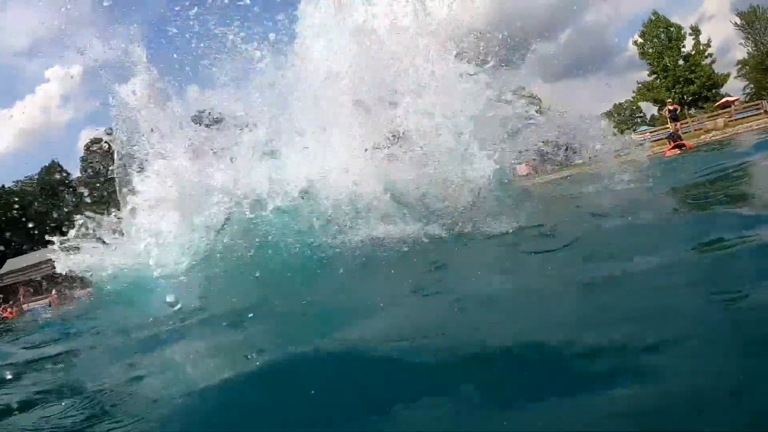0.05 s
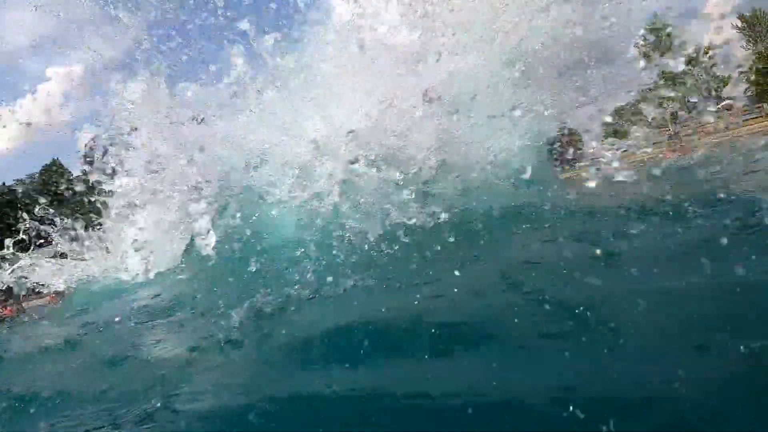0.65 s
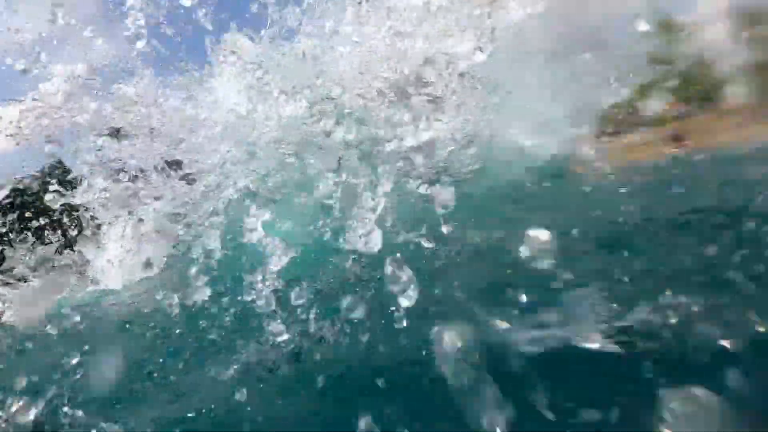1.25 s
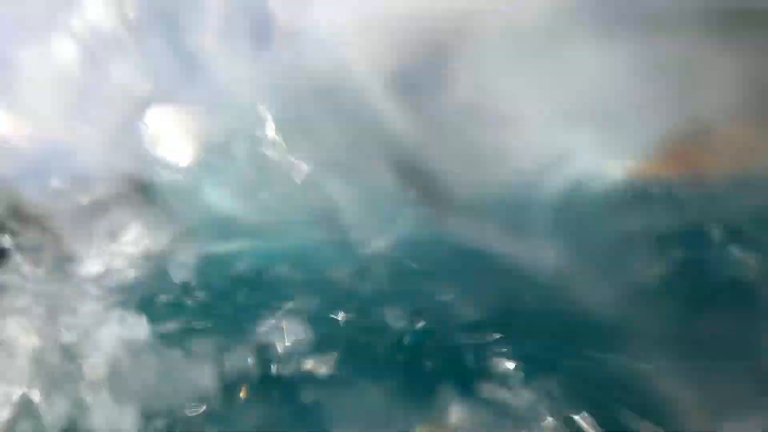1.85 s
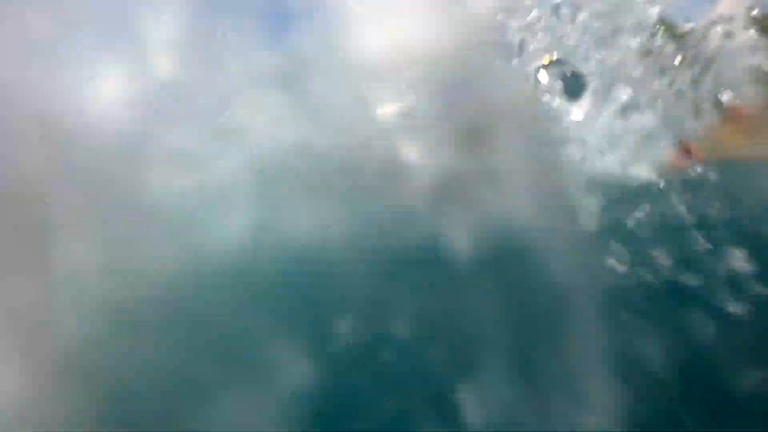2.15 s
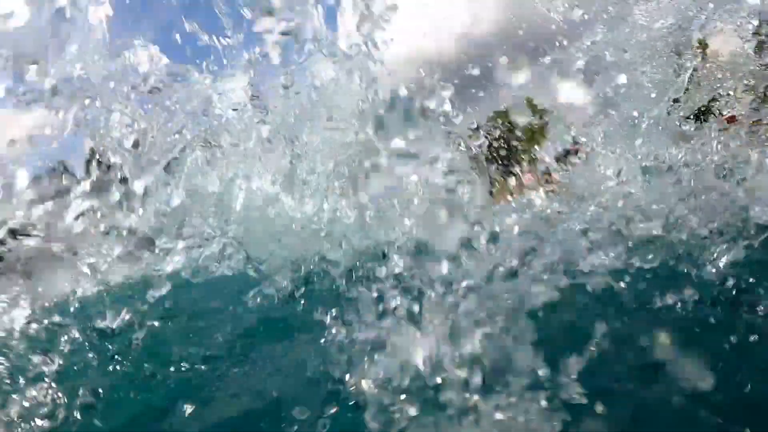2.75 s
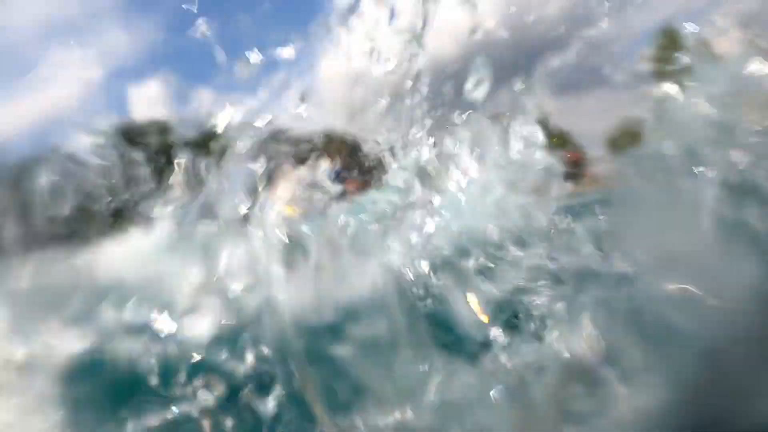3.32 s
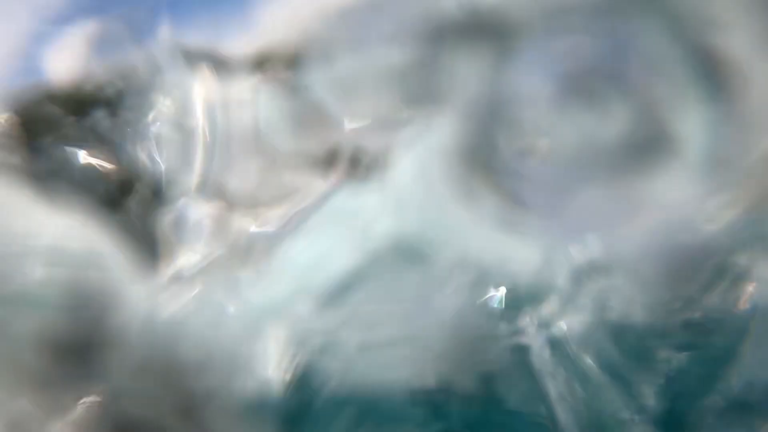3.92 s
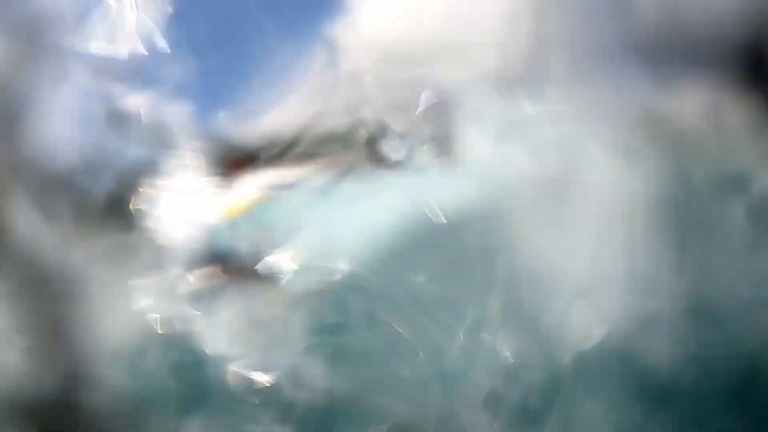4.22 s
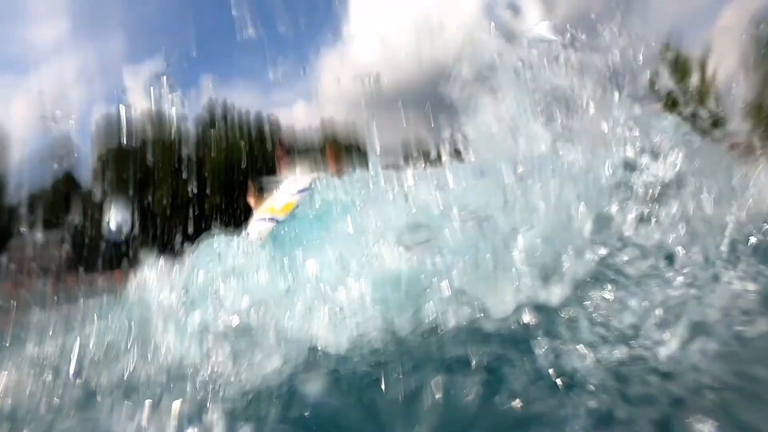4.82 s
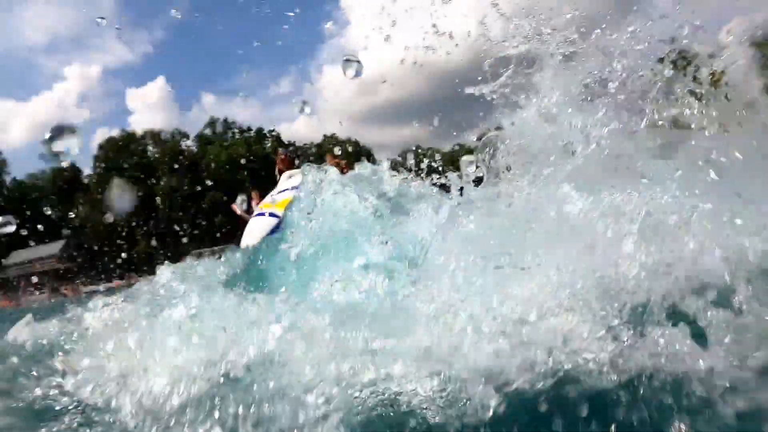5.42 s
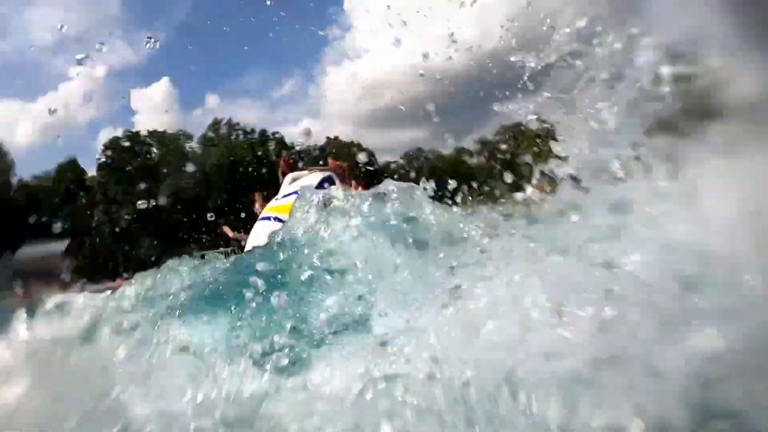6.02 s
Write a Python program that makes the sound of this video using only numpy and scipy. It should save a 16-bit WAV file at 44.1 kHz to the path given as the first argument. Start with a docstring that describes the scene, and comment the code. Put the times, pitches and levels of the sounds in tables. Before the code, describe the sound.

Water sloshes and spatters directly against a microphone riding on a lake. A low rumble opens, and spray and single drops start to land with a slightly hollow ring. Deep, distorted thumps then break in, strongest from about two to three seconds, with dull knocks and one small rising gurgle. After that, repeated low surges keep churning under slapping water, bubbling spray and sharp little drips.

```python
"""Splash on a floating camera

A waterproof camera rides at the surface of a lake while a big splash comes down on it.
Surges press on its two microphone ports as deep thumps that overload them, and edges of water knock.
Slapping lumps, bubbling spray and single drops set the hollow case ringing.
A shrinking air pocket gurgles once; a faint hiss lies underneath."""
import sys
import numpy as np
from scipy import signal
from scipy.fft import rfft, irfft
from scipy.io import wavfile
from scipy.ndimage import uniform_filter1d

SR = 44100
rng = np.random.default_rng(int(sys.argv[2]) if len(sys.argv) > 2 else 0)


def transcribe(u):
    """Save the signal u as a 16-bit wav file named by the first command-line argument.

    u: samples, shape (n,) or (channels, n), limited to [-1, 1]; the rate is SR.
    q: integer samples, one column per channel.
    """
    v = np.clip(np.atleast_2d(u).T, -1, 1)
    q = np.round(v * 32767).astype(np.int16)
    wavfile.write(sys.argv[1], SR, q)


N = 267687
TIME_S = np.arange(N) / SR

# Spectrum of spray. Each row: frequency in Hz, relative density in dB.
SPRAY_SPECTRUM = [(80, -3.5), (250, 6), (450, -2.5), (750, -2), (1100, -4.5), (1500, -2.5), (2100, -7.5),
                  (2700, -10.5), (4000, -16.5), (6000, -22), (10500, -30.5), (16000, -39.5)]


def gain(db):
    """Decibels to amplitude."""
    return 10 ** (np.asarray(db) / 20)


def unit_rms(x):
    """Scale to an rms of one."""
    return x / np.sqrt(np.mean(x ** 2) + 1e-20)


def at_hz(rows, hz):
    """Interpolate a curve over log frequency."""
    row_hz, value = np.transpose(rows)
    return np.interp(np.log(hz + 1), np.log(row_hz), value)


def over_time(rows, column=1):
    """Interpolate one column over the whole scene."""
    rows = np.asarray(rows)
    return np.interp(TIME_S, rows[:, 0], rows[:, column])


def add(mix, start_s, sound):
    """Add a sound into the mix in place."""
    part = mix[:, max(round(start_s * SR), 0):][:, :sound.shape[-1]]
    part += sound[..., :part.shape[-1]]


def panned(x, pan_db):
    """Set the balance, left minus right."""
    return x * gain([[pan_db / 2], [-pan_db / 2]])


def coloured(x, spectrum):
    """Filter by a dB curve, at unit rms."""
    hz = np.fft.rfftfreq(x.shape[-1], 1 / SR)
    return unit_rms(irfft(rfft(x) * gain(at_hz(spectrum, hz)), x.shape[-1]))


def at_ports(pair):
    """Blend two unrelated signals into the partly alike pair that the ports hear."""
    # Likeness of the ports. Each row: frequency in Hz, left-right correlation.
    likeness = [(100, 0.33), (250, 0.37), (500, 0.45), (1500, 0.64), (5000, 0.56), (12000, 0.65)]
    a, b = rfft(pair)
    shared = np.clip(at_hz(likeness, np.fft.rfftfreq(pair.shape[-1], 1 / SR)), 0, 1)
    return irfft(np.array([a, shared * a + np.sqrt(1 - shared ** 2) * b]), pair.shape[-1])


def port_noise(samples):
    """White noise at the two ports."""
    return at_ports(rng.standard_normal((2, samples)))


def resonant(x, hz, width_hz):
    """One resonance."""
    return signal.lfilter(*signal.iirpeak(min(hz, .45 * SR), max(hz / width_hz, 1), SR), x)


def band(x, hz, width_hz):
    """Two equal resonances in series, at unit rms."""
    return unit_rms(resonant(resonant(x, hz, width_hz), hz, width_hz))


def bubble(t, hz, cycles, climb=0):
    """A damped ring; climb raises its pitch, as for a bubble nearing the surface."""
    age = t * hz / cycles
    tone = np.sin(2 * np.pi * hz * t * (1 + climb * np.minimum(age, 5)))
    return tone * np.exp(-age) * (1 - np.exp(-2 * t * hz))


def surges(eddy_share=0.22, overload=0.82, sag_share=0.19, sag_s=0.018):
    """Pressure swings shed eddies, flatten when too strong and sag as the microphone recovers."""
    # Each row: peak time in seconds, level before overload in dB, pitch in Hz, rise in seconds.
    swings = [(0.027, -8, 74.2, 0.011), (0.192, -9, 54, 0.071), (0.375, -9.5, 56.2, 0.017),
              (0.459, -1.5, 53.8, 0.018), (0.566, -2, 56.8, 0.039), (0.646, -2.5, 52.6, 0.037),
              (1.751, -6.5, 49.1, .013), (1.873, -19.5, 57, 0.028), (1.968, 8.5, 79.6, 0.014),
              (2.153, -24, 66.1, 0.036), (2.706, 5, 54, 0.0056), (2.73, 9, 93.5, 0.0053),
              (2.843, 3, 147.3, 0.0035), (2.989, 4.5, 101.7, 0.015), (3.133, -5.5, 85.4, .022),
              (3.209, -8.5, 85.3, 0.013), (3.458, -9, 68, .007), (3.632, -6, 56.9, 0.0093),
              (3.807, -8.5, 50, 0.01), (3.907, -0.5, 55.9, .017), (4.105, -3.5, 47.3, 0.015),
              (4.223, 0.5, 71.9, 0.024), (4.273, -2, 70, 0.013), (4.313, 3.5, 47, 0.013),
              (4.478, 0.5, 39.4, 0.01), (4.573, 2, 79.4, 0.0054), (4.622, -3, 48.9, 0.035),
              (4.703, -7, 50.9, 0.0083), (4.741, -8, 43.7, 0.02), (4.832, -5, 48.7, 0.01),
              (5.118, -16, 55.3, 0.02), (5.331, -8, 29.6, .014), (5.392, 0, 50.6, 0.022),
              (5.481, -9.5, 54, 0.017), (5.533, -5.5, 53.4, 0.015), (5.577, 2.5, 55, 0.0068),
              (5.628, 1, 45.7, 0.019), (5.811, -10.5, 55, 0.016)]
    # Churning under the surges. Each row: time in seconds, level in dB.
    churn_levels = [(0, -13), (.64, -21), (.8, -37.5), (1.68, -36.5), (1.85, -20.5), (2.0, -26),
                    (2.2, -39.5), (2.55, -44.5), (2.68, -18.5), (3.05, -18.5), (3.33, -28), (3.7, -19.5),
                    (4.35, -22), (4.85, -27.5), (5.24, -33), (5.5, -16.5), (5.85, -27), (6.07, -29)]
    # Churn and eddy spectra. Each row: frequency in Hz, relative density in dB.
    churn_spectrum = [(10, 2.5), (30, -3), (60, 0.5), (100, -9.5), (160, -28), (280, -35), (450, -44.5),
                      (900, -83)]
    eddy_spectrum = [(10, 3), (30, -8), (60, 2), (120, -30.5), (250, -29.5), (450, -36.5), (900, -77.5)]
    pressure, t = np.zeros((1, N)), np.arange(SR // 4) / SR
    for peak_s, db, hz, rise_s in swings:
        swell = (t / rise_s * np.exp(1 - t / rise_s)) ** 3
        thump = swell * np.cos(2 * np.pi * hz * (t - rise_s))
        late = np.maximum(t - rise_s, 0) / sag_s
        sag = sag_share * min(gain(db), 1) * late * np.exp(1 - late)
        add(pressure, peak_s - rise_s, gain(db) * (thump - sag))
    pressure += gain(over_time(churn_levels)) * coloured(rng.standard_normal(N), churn_spectrum)
    eddies = coloured(rng.standard_normal(N), eddy_spectrum)
    pressure += eddy_share * abs(signal.hilbert(pressure)) * eddies
    port_leak = signal.butter(1, 2, "highpass", fs=SR, output="sos")
    pressure = signal.sosfilt(port_leak, pressure)
    squashed = pressure / (1 + (pressure / overload) ** 4) ** .25
    return signal.sosfilt(signal.butter(3, 800, fs=SR, output="sos"), squashed)


def hiss(level_db=-76):
    """A very faint steady hiss."""
    # Each row: frequency in Hz, relative density in dB.
    spectrum = [(300, -17), (2000, 12.5), (8000, 8.5), (16000, -22.5)]
    return gain(level_db) * coloured(port_noise(N), spectrum)


def knocks(level_db=5, hz=310, cycles=0.75):
    """A hard edge of water gives the case one short, dull knock."""
    # Each row: start in seconds, relative level in dB.
    hits = [(0.082, -18.5), (.642, -27), (.916, -19.5), (1.962, -17), (2.728, -16), (2.841, -13),
            (2.988, -12), (4.567, -22.5), (4.588, -21), (4.702, -24.5), (4.736, -27), (4.831, -35),
            (5.391, -32), (5.576, -23.5), (5.625, -22)]
    out, t = np.zeros((1, N)), np.arange(2000) / SR
    for start_s, db in hits:
        add(out, start_s, gain(db + level_db) * bubble(t, hz, cycles))
    return signal.sosfilt(signal.butter(3, 1000, fs=SR, output="sos"), out)


def slaps(level_db=-8, burst_db=-3, note_db=2, attack_s=0.001):
    """A lump of water bursts in hiss; the air it traps rings as a cloud around one large bubble."""
    # Each row: start in seconds, relative level in dB, pitch in Hz, t60 in seconds, hiss trim in dB.
    lumps = [(.175, -54, 1604, 0.091, 18), (.289, -47.5, 1573, 0.59, -12), (0.445, -50, 1730, 0.24, 15.5),
             (.57, -34, 1280, 0.27, 5.5), (0.765, -28, 1230, 0.15, 4), (0.927, -27.5, 733, 0.63, 1.5),
             (1.014, -28.5, 1083, 0.14, 4), (1.166, -36.5, 1546, 0.23, 10), (1.369, -26, 1630, 0.18, -23),
             (1.502, -31.5, 1460, 0.16, 8.5), (1.614, -24, 2343, 0.14, -12), (1.858, -25.5, 1397, 0.19, 8),
             (2.184, -28, 855, 0.25, 1), (2.363, -36.5, 1890, 0.25, 2), (2.435, -17.5, 520, 0.17, 1),
             (2.438, -9.5, 1433, 0.084, -12), (2.571, -22, 1430, .045, -19),
             (2.623, -30.5, 1520, .24, 12.5), (2.668, -22, 953, 0.14, 1.5), (2.771, -25.5, 1527, 0.18, 2.5),
             (2.874, -26.5, 1320, 0.21, 10.5), (3.097, -19.5, 1503, 0.059, 0.5),
             (3.122, -25, 2066, 0.17, 4.5), (3.38, -21, 322, .1, -25), (3.593, -31, 1210, 0.36, -21),
             (3.659, -18.5, 1384, 0.049, 1), (3.681, -14.5, 1492, 0.11, -21),
             (3.686, -16.5, 749, 0.18, -16), (3.859, -30.5, 948, 0.38, 4.5), (3.96, -14, 757, 0.083, -31),
             (4.122, -23.5, 1142, 0.13, -10), (4.224, -14, 1549, 0.1, -8.5), (4.282, -24, 695, 0.15, -2),
             (4.917, -26, 1146, 0.1, -1.5), (5.059, -40.5, 1307, 0.45, -28),
             (5.287, -19.5, 2110, 0.083, -8.5), (5.416, -25, 1780, 0.11, -6),
             (5.503, -35.5, 1950, 0.17, -25), (5.684, -21.5, 751, 0.12, -13), (5.817, -21.5, 630, 0.18, -1),
             (5.935, -21.5, 895.5, 0.15, -25)]
    out, t = np.zeros((2, N)), np.arange(12000) / SR
    for start_s, db, hz, t60_s, trim_db in lumps:
        pan_db = rng.normal(-3, 5)
        cloud = band(port_noise(len(t)), hz, width_hz=0.4 * hz)
        burst = gain(burst_db + trim_db) * coloured(port_noise(len(t)), SPRAY_SPECTRUM)
        envelope = (1 - np.exp(-t / attack_s)) * gain(-60 * t / t60_s)
        note = gain(note_db) * bubble(t, hz, cycles=0.13 * t60_s * hz, climb=0.015)
        slap = (cloud + burst) * envelope + note
        add(out, start_s, panned(gain(db + level_db) * slap, pan_db))
    return out


def hollow_case(x, ring_db=4, direct_db=-1):
    """The hollow case rings on after whatever lands on it."""
    # Each row: frequency in Hz, relative level in dB, t60 in seconds.
    modes = [(550, -3, .3), (727, -1, .2), (810, -4, .18), (935, -4, .18), (1025, -9, .2), (1195, -5, .18),
             (1330, 2, .55), (1455, -5, .14), (1706, -7, .18), (2311, -11, .12), (3462, -13, .08)]
    ring = sum(gain(db) * resonant(x, hz, 2.2 / t60_s) for hz, db, t60_s in modes)
    return gain(direct_db) * x + gain(ring_db) * ring


def sheet_envelopes(rise_s=0.0055, fade_db_per_s=180):
    """Body and treble envelopes: sheets of spray swell, hold and thin out, adding in power."""
    # Each row: start in seconds, hold in seconds, level in dB, treble in dB (finer spray is brighter).
    sheets = [(0.303, 0.096, -57.5, 5), (.56, 0.1, -56.5, 4.5), (0.748, 0.064, -33, 0.5),
              (0.88, 0.16, -41.5, -3.5), (1.294, .13, -40, 3.5), (1.487, 0.16, -36.5, 0),
              (1.727, 0.15, -39, -6.5), (1.851, 0.036, -34, -1), (2.15, 0.093, -54.5, 9.5),
              (2.345, 0.029, -51, 13.5), (2.434, 0.1, -32, -7.5), (2.652, 0.022, -44, 13.5),
              (2.816, 0.019, -39, 4.5), (2.859, 0.026, -29.5, -16), (2.99, 0.17, -43, 2),
              (3.293, 0.023, -38, -8), (3.413, 0.13, -41, -2), (3.592, 0.11, -39.5, 6),
              (3.85, 0.2, -37.5, -8), (4.037, 0.13, -39, 3), (4.258, 0.048, -42, 1.5),
              (4.368, 0.061, -37.5, 4.5), (4.479, 0.097, -44.5, 0), (4.904, 0.065, -44, 3.5),
              (4.997, 0.038, -35.5, -5), (5.184, 0.035, -50, 3.5), (5.245, 0.14, -44, -2),
              (5.576, .08, -41.5, 6), (5.676, 0.022, -35, -2), (5.811, 0.036, -37.5, -26),
              (5.888, 0.089, -43, -32), (6.049, .03, -36, 8)]
    power, t = np.zeros((2, N)), np.arange(SR // 2) / SR
    for start_s, hold_s, db, treble_db in sheets:
        fall = (1 - np.exp(-t / rise_s)) * gain(db - fade_db_per_s * np.maximum(t - hold_s, 0))
        add(power, start_s, (gain([[0], [treble_db]]) * fall) ** 2)
    return np.sqrt(power)


def far_wash(patchy_db=3):
    """Far drops merge into noise, patchy in time and frequency."""
    _, _, cells = signal.stft(rng.standard_normal((2, N)), SR, nperseg=256, noverlap=192)
    patches = uniform_filter1d(rng.standard_normal(cells.shape[1:]), size=6, axis=0)
    patches = unit_rms(uniform_filter1d(patches, size=16, axis=1))
    _, wash = signal.istft(cells * gain(patchy_db * patches), SR, nperseg=256, noverlap=192)
    return coloured(at_ports(wash[:, :N]), SPRAY_SPECTRUM)


def plink(hz, t, bubbles=7):
    """A drop traps a cluster of bubbles of nearly one size; each port hears its own mix."""
    detune, late, phase = rng.random((3, bubbles, 1))
    bubble_hz = hz * 1.4 ** (detune - .5)
    age_s = np.maximum(t - .004 * late ** 2, 0)
    decay_s = 9 / np.sqrt(hz * 3000) * rng.uniform(.5, 1.3)  # about 9 cycles at 3 kHz
    envelope = np.exp(-age_s / decay_s) * (1 - np.exp(-age_s * hz / 2))
    rings = np.sin(2 * np.pi * (bubble_hz * age_s + phase)) * envelope
    pair = (1 + .9 * rng.standard_normal((2, bubbles))) @ rings
    return pair * np.sqrt(np.sqrt(hz) / np.sum(pair ** 2))


def near_plinks(pitches=160, base_rate_per_s=1600):
    """Near drops land at random: low plinks fuse, high ones vary more in size and stand out."""
    out, t = np.zeros((2, N)), np.arange(2000) / SR
    for hz in np.geomspace(500, 14000, pitches):
        ring = plink(hz, t)
        count = int(base_rate_per_s * N / SR / pitches * np.sqrt(hz / 2500))
        when, chance = rng.random((count, 2)).T
        spread_db = 5.2 * np.clip(np.sqrt(hz / 4500), .6, 1.05)
        sizes = gain(spread_db * (np.minimum(-np.log(1 - chance), 4) - 1.5))
        for start_s, size in zip(when * N / SR, sizes):
            add(out, start_s, size * ring)
    return coloured(out, SPRAY_SPECTRUM)


def spray(wash_db=-1, near_db=-4, split_hz=3500, pan_db=-1.2):
    """Far wash and near plinks follow the falling sheets; stray plinks carry on between them."""
    # Stray drops. Each row: time in seconds, relative level in dB.
    drizzle = [(0, -74.5), (.5, -59), (.8, -39.5), (1.22, -48.5), (1.95, -46), (2.3, -49.5), (2.9, -42.5),
               (3.25, -69.5), (3.8, -41), (4.55, -46), (4.8, -63.5), (5.2, -56.5), (6.07, -44.5)]
    wash = gain(wash_db) * far_wash()
    near = gain(near_db) * near_plinks()
    water = wash + near
    body = signal.sosfiltfilt(signal.butter(2, split_hz, fs=SR, output="sos"), water)
    body_envelope, treble_envelope = sheet_envelopes()
    strays = gain(over_time(drizzle)) * near
    return panned(body_envelope * body + treble_envelope * (water - body) + strays, pan_db)


def drops(level_db=-1, tick_decay_s=0.0052, splat_db=-15, splat_decay_s=0.028):
    """A drop ticks on the case at its own pitch and scatters in a short splat."""
    # Each row: time in seconds, relative level in dB, pitch in Hz, left minus right in dB.
    hits = [(0.705, -32.5, 3440, -2), (0.78, -27, 2540, 3), (.835, -38, 6660, 2), (.968, -29, 4600, -4),
            (1.027, -31, 4070, -5), (1.351, -34, 4120, 0), (1.51, -26.5, 4500, -3), (1.617, -31, 2270, 14),
            (1.633, -23, 4440, -1), (1.856, -28.5, 2860, -2), (2.189, -34, 4070, 3), (2.238, -37, 5930, 0),
            (2.823, -30, 3120, 2), (3.005, -22, 3470, -2), (3.051, -24, 2360, -1), (3.098, -27, 4330, 1),
            (3.314, -30, 3470, -5), (3.424, -34, 10600, 8), (3.444, -35, 3500, -1),
            (3.683, -22.5, 2720, -4), (3.714, -28, 3300, -10), (3.846, -36.5, 6300, -2),
            (3.895, -30, 4770, -7), (3.941, -30, 3640, -3), (4.281, -33.5, 7000, -10),
            (4.366, -35.5, 10500, -12), (5.057, -29.5, 3000, -3), (5.416, -30, 3500, -1.5),
            (5.588, -35, 5660, 1), (5.621, -28, 2470, -1), (5.808, -33, 9400, -7), (5.821, -29.5, 3750, -1),
            (5.9, -28.5, 2980, -1), (6.022, -36.5, 5230, -6)]
    out, t = np.zeros((2, N)), np.arange(3000) / SR
    onset = 1 - np.exp(-(t / .0008) ** 2)
    for time_s, db, hz, pan_db in hits:
        noise = port_noise(len(t))
        tick = band(noise, hz, width_hz=0.3 * hz) * np.exp(-t / tick_decay_s)
        splat = gain(splat_db) * band(noise, hz=3300, width_hz=6000) * np.exp(-t / splat_decay_s)
        add(out, time_s - .001, panned(gain(db + level_db) * (tick + splat) * onset, pan_db))
    return out


def gurgle():
    """A soft note climbs as a pocket of air shrinks."""
    # Each row: time in seconds, pitch in Hz, level in dB.
    pocket = [(2.17, 121, -68), (2.24, 147.6, -41), (2.3, 202, -43), (2.35, 284, -47)]
    cycles = np.cumsum(over_time(pocket)) / SR
    sounding = (TIME_S > pocket[0][0]) & (TIME_S < pocket[-1][0])
    return sounding * gain(over_time(pocket, column=2)) * np.sin(2 * np.pi * cycles)


def scene():
    """Stereo splashes through the case, over mono surges, knocks and gurgle, plus hiss."""
    return hollow_case(spray() + slaps() + drops()) + surges() + knocks() + gurgle() + hiss()


def record(dry, fade_in_s=0.008, cutoff_hz=15900):
    """Fade in, clip at full scale, low-pass."""
    clipped = np.clip(dry * np.minimum(TIME_S / fade_in_s, 1), -1, 1)
    lowpass = signal.firwin(511, cutoff_hz, window=("kaiser", 9), fs=SR)
    return signal.oaconvolve(clipped, lowpass[None], "same")


dry = scene()
out = record(dry)
transcribe(out)
```